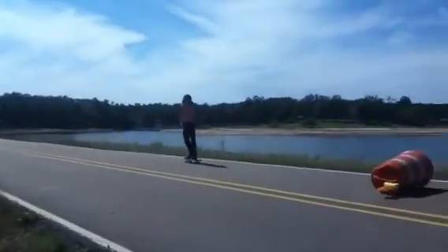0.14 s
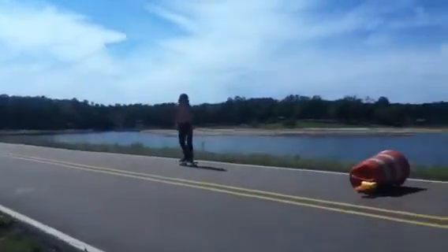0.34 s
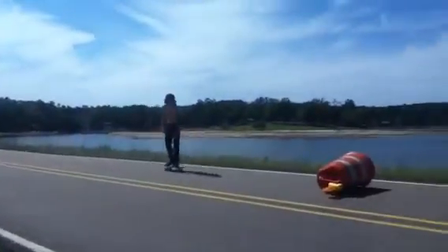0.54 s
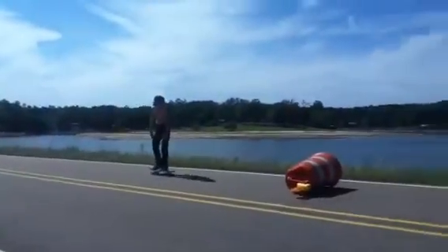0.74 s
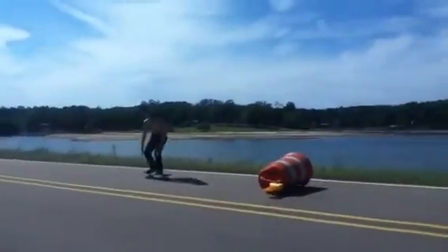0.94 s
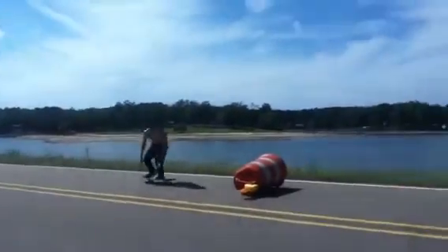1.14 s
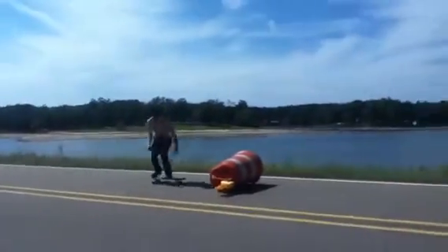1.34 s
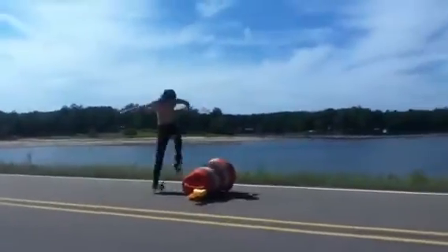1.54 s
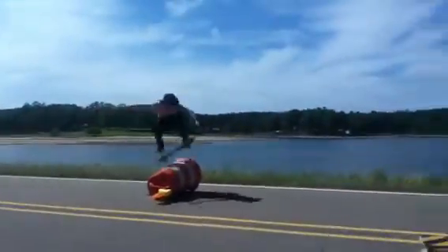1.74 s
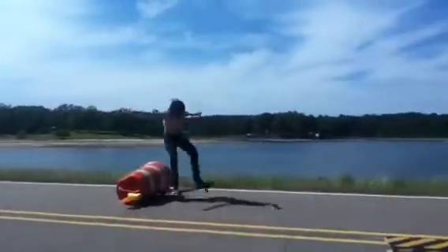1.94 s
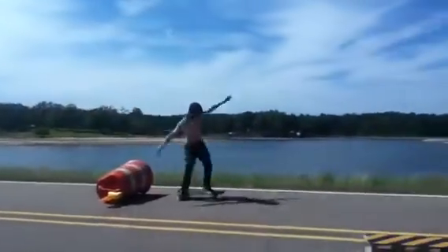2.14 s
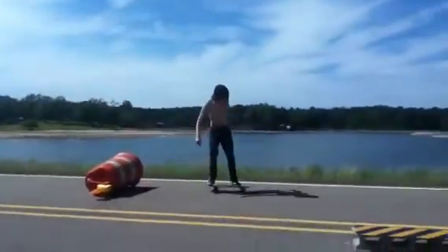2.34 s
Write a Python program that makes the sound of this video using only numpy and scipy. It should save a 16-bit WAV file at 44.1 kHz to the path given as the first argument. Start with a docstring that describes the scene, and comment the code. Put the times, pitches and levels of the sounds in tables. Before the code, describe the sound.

Skateboard rolls gritty on rough asphalt, pops its tail, goes quiet, then lands with sharp clacks

```python
"""A skateboard rolls over rough asphalt: wheels hitting stone tips give a low rumble and a gritty crunch.
It pops its tail, flies over a barrel with its wheels spinning free, lands with two clacks and rolls on.
Blows are short noise cracks with ringing wood and truck modes; pebbles click under the wheels.
Gusts, bursts of low noise with brighter turbulence, buffet a small microphone over a soft bed of open air.
The microphone overloads on the strongest gust and on the landing, and adds a thin whine."""
import sys
import numpy as np
from scipy import signal
from scipy.fft import rfft, irfft
from scipy.io import wavfile

SR = 44100
rng = np.random.default_rng(int(sys.argv[2]) if len(sys.argv) > 2 else 0)


def bounce(signal):
    """Save signal as a 16-bit WAV file at the path given by the first command-line argument."""
    frames = np.transpose(np.atleast_2d(signal))
    limited = np.clip(frames, -1, 1)
    pcm = np.round(limited * 32767).astype(np.int16)
    wavfile.write(sys.argv[1], SR, pcm)


N = 105840
TIME = np.arange(N) / SR
EDGE_HZ = 15600  # upper edge of the microphone's band


def amp(db):
    """Decibels to gain."""
    return 10 ** (np.asarray(db) / 20)


def unit(x):
    """Scales to rms 1."""
    return x / np.sqrt(np.mean(x ** 2) + 1e-20)


def level(points, axis=1):
    """Gain over time from one dB column of a curve."""
    columns = np.transpose(points)
    return amp(np.interp(TIME, columns[0], columns[axis]))


def decay(t, t60):
    """Exponential fade that falls 60 dB in t60 seconds."""
    return np.exp(-np.log(1000) * t / t60)


def colour(x, points):
    """Gives x a spectrum, at rms 1."""
    hz, db = np.transpose(points)
    f = np.fft.rfftfreq(len(x), 1 / SR)
    gain = amp(np.interp(np.log(f + 1), np.log(hz), db))
    return unit(irfft(rfft(x) * gain, len(x)))


def wander(rate_hz):
    """Slow random drift up to about a rate, at rms 1."""
    f = np.fft.rfftfreq(N, 1 / SR)
    band = f / (f + 10) * np.exp(-(f / rate_hz) ** 2)
    return unit(irfft(rfft(rng.standard_normal(N)) * band, N))


def add(mix, s, sound):
    """Mixes a sound in at a time in seconds."""
    part = mix[round(s * SR):][:len(sound)]
    part += sound[:len(part)]


STONES_PER_S, STONE_SPREAD_DB, CONTACT_SHARE = 1500, 3.5, 0.85


def stones():
    """Wheels strike countless stone tips, a few of them large, over a smooth contact noise."""
    size = amp(STONE_SPREAD_DB * np.minimum(rng.exponential(1, N), 4))
    struck = rng.random(N) < STONES_PER_S / SR
    hits = size * rng.choice([-1, 1], N) * struck
    return unit(hits) + CONTACT_SHARE * rng.standard_normal(N)


PATCH_DB, PATCH_HZ = 2.0, 35  # rms swing of each band, and how fast it swings


def patchy(x, count=24):
    """Changing asphalt: narrow bands swell and fade, each on its own."""
    place = np.log(np.fft.rfftfreq(N, 1 / SR) + SR / 20)
    place = (place - place[0]) / (place[-1] - place[0]) * (count - 1)
    spectrum = rfft(x)
    out = np.zeros(N)
    for k in range(count):
        band = irfft(spectrum * np.maximum(1 - abs(place - k), 0), N)
        out += band * amp(PATCH_DB * wander(PATCH_HZ))
    return unit(out)


# Rolling on the road: (time [s], wheel and deck rumble level [dB], grit hiss level [dB])
ROLL = [(0, -30, -37.5), (.3, -31.5, -38), (.8, -34, -35), (.93, -35, -32.5), (1.05, -31, -32.5),
        (1.2, -33, -34), (1.5, -31.5, -35), (1.55, -28, -30.5), (1.58, -29, -40.5), (1.6, -25.5, -29),
        (1.625, -79, -59), (2.04, -68, -72), (2.1, -40, -50), (2.14, -50, -44), (2.27, -35.5, -49.5),
        (2.32, -39.5, -46), (2.36, -34, -36), (2.4, -38, -33)]
# Spectrum of the wheel and deck rumble: (frequency [Hz], density [dB per Hz])
RUMBLE = [(40, -41), (150, -9), (330, 0), (480, -4), (620, -2), (860, -4.5), (1080, -14.5), (1350, -14.5),
          (1600, -23), (1950, -17.5), (2500, -53), (5000, -80)]
# Spectrum of the grit, also used for the hiss in flight: (frequency [Hz], density [dB per Hz])
GRIT = [(200, -9.5), (1200, -3.5), (2000, -2.5), (2700, -3.5), (3300, 2), (3850, 3.5), (4500, -2.5),
        (5300, -2.5), (7000, -4.5), (9000, -10.5), (11800, -16.5), (13000, -28), (16000, -26)]
RUMBLE_FLUTTER_DB, GRIT_FLUTTER_DB, FLUTTER_HZ = 1.5, 0.8, 73


def rolling():
    """The road shakes wheels and deck into a rumble and crunches as grit; both flutter together."""
    road, flutter = stones(), wander(FLUTTER_HZ)
    rumble = colour(road, RUMBLE) * unit(amp(RUMBLE_FLUTTER_DB * flutter))
    grit = patchy(colour(road + stones(), GRIT)) * unit(amp(GRIT_FLUTTER_DB * flutter))
    return rumble * level(ROLL, axis=1) + grit * level(ROLL, axis=2)


def resonance(hz, width_hz):
    """Road shocks in one resonance, which may glide; rms 1."""
    lowpass = signal.butter(2, width_hz / 2, fs=SR, output="sos")
    band = signal.sosfilt(lowpass, stones() + 1j * stones())
    phase = 2 * np.pi * np.cumsum(hz * np.ones(N)) / SR
    return unit((band * np.exp(1j * phase)).real)  # shifts the band up to its pitch


POP_S = 1.6073  # the tail pop, which also cuts off the deck drone
# Wheels and trucks sing briefly as the load shifts:
# (middle time [s], length [s], pitch at the middle [Hz], width [Hz], level [dB])
SINGS = [(.07, 0.094, 5130, 350, -44), (0.375, 0.2, 3170, 80, -43), (0.689, 0.12, 3670, 220, -40.5),
         (.87, 0.082, 3650, 300, -38.5), (1.083, 0.16, 3680, 650, -35), (1.438, 0.058, 5650, 1000, -37.5),
         (1.547, 0.014, 3400, 450, -28.5)]
SING_SAG_PER_S = .55  # fall in pitch per second, as a share of the pitch
# The loaded deck drones as the rider crouches: (time [s], level [dB])
CROUCH = [(.9, -70), (1.03, -29.5), (1.3, -36), (1.55, -32.5), (1.6, -25)]
DRONE_HZ, DRONE_WIDTH_HZ = 822, 210


def singing():
    """Narrow resonances of deck, wheels and trucks stand out of the rolling noise."""
    out = resonance(DRONE_HZ, DRONE_WIDTH_HZ) * level(CROUCH) * (TIME < POP_S)
    for s, length, hz, width, db in SINGS:
        swell = amp(db) * np.exp(-(2 * (TIME - s) / length) ** 4)
        pitch = hz * (1 - SING_SAG_PER_S * (TIME - s))
        out += swell * resonance(pitch, width)
    return out


# Spectrum of a crack, also used for the outdoor scatter: (frequency [Hz], density [dB per Hz])
CRACK = [(50, -16), (250, -8), (700, 4.5), (1150, -6), (1900, -0.5), (2600, -5.5), (3500, -2), (4500, -8.5),
         (5600, -6.5), (8000, -9.5), (11000, -16), (16000, -25)]
# Ringing modes of the tail: (frequency [Hz], level [dB], T60 [s])
TAIL = [(757, 3, 0.02), (958, 6, 0.028), (1860, -6.5, 0.014), (1980, 5, 0.02), (2540, -3.5, 0.018),
        (3470, 4, 0.016), (3760, 4, 0.016), (4030, 2, 0.014)]
# the crack and snap levels are relative, POP_DB then sets the whole pop
POP_DB, POP_CRACK_DB, POP_CRACK_T60_S, POP_DULL_HZ = -14.5, 2, .042, 7060
SNAP_DB, SNAP_S = 10.5, .00008


def pop():
    """The tail snaps on the asphalt in one sharp pressure pulse; grit cracks and the wood rings."""
    t = np.arange(SR // 5) / SR
    u = 2 - t / SNAP_S
    snap = u * np.exp(-u ** 2 / 2)
    crack = colour(rng.standard_normal(len(t)), CRACK) * decay(t, POP_CRACK_T60_S)
    ring = np.zeros(len(t))
    for hz, db, t60 in TAIL:
        ring += amp(db) * decay(t, t60) * np.sin(2 * np.pi * hz * t)
    soften = signal.butter(1, min(POP_DULL_HZ, EDGE_HZ), fs=SR)
    return amp(POP_DB) * signal.lfilter(*soften, amp(SNAP_DB) * snap + ring + amp(POP_CRACK_DB) * crack)


# Ringing modes of deck and trucks: (frequency [Hz], level [dB], T60 [s])
BOARD = [(252.4, -3.5, 0.021), (377, -5, 0.043), (513, -21.5, 0.022), (674, -3, 0.032), (754, 0.5, 0.025),
         (930, -1.5, 0.022), (1175, -13.5, 0.035), (1317, 1, 0.039), (1893, -4, 0.035), (2070, -7.5, 0.027),
         (3380, -16.5, 0.029), (3630, -14, 0.021), (5350, -6, 0.017), (5690, -3.5, 0.011)]
RING_DB, CRACK_DB, FOCUS_OCTAVES = -10, -2.5, 0.22


def blow(db, dull_hz, crack_t60, focus_hz, lift_db):
    """A short crack and the modes of the board; the place and hardness of contact colour both."""
    t = np.arange(SR // 5) / SR
    crack = colour(rng.standard_normal(len(t)), CRACK) * decay(t, crack_t60)
    ring = np.zeros(len(t))
    for k, (hz, mode_db, t60) in enumerate(BOARD):
        lift = lift_db * np.exp(-(np.log2(hz / focus_hz) / FOCUS_OCTAVES) ** 2)
        ring += (-1) ** k * amp(mode_db + lift) * decay(t, t60) * np.sin(2 * np.pi * hz * t)
    soften = signal.butter(1, min(dull_hz, EDGE_HZ), fs=SR)
    return amp(db) * signal.lfilter(*soften, amp(CRACK_DB) * crack + amp(RING_DB) * ring)


# Blows on the board: (time [s], level [dB], dull above [Hz], crack T60 [s],
# most excited pitch [Hz], lift of that pitch [dB])
BLOWS = [(1.597, -15.5, 1000, 0.037, 780, 11), (1.8697, -26.5, 4000, 0.061, 900, 4),
         (1.875, -28.5, 2480, 0.052, 250, 30), (1.917, -42, 9000, 0.032, 5500, 2),
         (2.0432, -1, 7000, 0.02, 3550, 19), (2.048, -5.5, 9000, 0.026, 5450, 11.5),
         (2.0511, -3, 5040, 0.031, 1370, 7), (2.0561, -9.5, 7950, 0.024, 250, 13),
         (2.077, -14, 12000, 0.031, 5500, 14), (2.0803, -6.5, 6000, 0.021, 2140, 11),
         (2.0835, -9, 905, 0.055, 692, 20)]
# Pebbles under the wheels: (time [s], level [dB], most excited pitch [Hz])
PEBBLES = [(.032, -27.5, 5380), (0.077, -30, 1900), (0.097, -23, 706), (0.281, -21, 8000),
           (.829, -26, 3500), (1.034, -20.5, 3500), (1.154, -30, 1900), (1.483, -23.5, 5400),
           (1.521, -22, 2000), (2.197, -29.5, 2020)]
PEBBLE_DULL_HZ, PEBBLE_T60_S, PEBBLE_LIFT_DB = 7000, 0.042, 7.5


def clacks():
    """Pebbles under the wheels, the tail pop, the feet catching the deck and the two trucks landing."""
    out = np.zeros(N)
    add(out, POP_S, pop())
    for s, *contact in BLOWS:
        add(out, s, blow(*contact))
    for s, db, hz in PEBBLES:
        add(out, s, blow(db, PEBBLE_DULL_HZ, PEBBLE_T60_S, hz, PEBBLE_LIFT_DB))
    return out


# Shoes scrape the grip tape and the free wheels hiss in the air: (time [s], level [dB])
FLIGHT = [(1.58, -65), (1.62, -48), (1.65, -45.5), (1.69, -41), (1.74, -61), (1.82, -61.5), (1.89, -45.5),
          (1.95, -52.5), (2.03, -63), (2.1, -85)]


def flight():
    """A thin scraping hiss while the board is off the ground."""
    return colour(stones(), GRIT) * level(FLIGHT)


ECHO_DB, ECHO_T60_S = -29, 0.083


def outdoors(x):
    """Faint scatter from the road and its verges: a short decaying noise tail."""
    t = np.arange(SR // 2) / SR
    tail = colour(rng.standard_normal(len(t)), CRACK) * decay(t, ECHO_T60_S)
    return x + amp(ECHO_DB) * signal.fftconvolve(x, tail / np.linalg.norm(tail))[:N]


LUMP_S, LUMP_EVENNESS = 0.041, 0.81  # span of the levelling, and its strength from 0 to 1


def eddies(points, size=N):
    """Low lumps of pressure of roughly equal strength."""
    x = colour(rng.standard_normal(size), points)
    power = signal.fftconvolve(x ** 2, signal.windows.hann(int(LUMP_S * SR)), "same")
    return unit(x / (abs(power) + 1e-9) ** (LUMP_EVENNESS / 2))


def burst(force, points):
    """Eddies under an envelope, with the energy of that envelope."""
    return unit(force * eddies(points, size=len(force))) * np.sqrt(np.mean(force ** 2))


# Gusts: (middle time [s], length [s], level [dB], eddy pitch [Hz])
GUSTS = [(0.148, 0.029, -20, 183), (0.22, 0.024, -16.5, 127), (0.264, 0.053, -18.5, 147),
         (0.321, 0.032, -16.5, 237), (0.402, 0.019, -12, 207), (0.427, 0.012, -7, 197),
         (0.441, 0.007, -8.5, 330), (.517, 0.014, -11, 152), (0.538, 0.022, -12.5, 306),
         (0.593, 0.041, -13.5, 157), (0.648, 0.047, -20, 220), (0.69, 0.013, -9.5, 166),
         (0.711, 0.021, -3, 230), (0.731, 0.024, -14, 117), (0.758, 0.034, -14.5, 132),
         (0.954, 0.057, -16, 156.6), (1.02, 0.032, -19, 133), (1.196, 0.021, -22.5, 162),
         (1.253, 0.0057, -17.5, 233), (1.39, 0.024, -16.5, 161), (1.431, 0.022, -19, 131),
         (1.491, 0.019, -19, 163), (1.58, 0.061, -18.5, 151), (1.635, 0.0086, -21, 153),
         (1.82, 0.013, -22, 165), (1.851, 0.034, -26.5, 140), (1.957, 0.039, -24, 143),
         (2.019, 0.016, -23, 150), (2.153, 0.041, -27.5, 166), (2.227, 0.058, -26.5, 170),
         (2.301, 0.044, -19.5, 159)]
# Spectrum of a gust: (multiple of the eddy pitch [ratio], density [dB per Hz])
EDDY = [(.1, -47), (.2, -37), (.38, -11.5), (.7, -1.5), (1, 0), (1.35, -6), (1.9, -18.5), (3, -26.5),
        (10, -88), (100, -110)]
# Spectrum of the brighter turbulence: (frequency [Hz], density [dB per Hz])
TURBULENCE = [(30, -83), (120, -15), (230, 9), (450, -6), (720, -14), (1100, -34.5), (1450, -26.5),
              (2500, -33), (16000, -83)]
# Steady breeze between the gusts: (time [s], level [dB])
BREEZE = [(0, -36), (.45, -21), (.85, -26), (1.15, -29.5), (1.55, -25), (1.76, -35.5), (2.1, -39),
          (2.4, -32.5)]
# Spectrum of the breeze on the microphone: (frequency [Hz], density [dB per Hz])
BUFFET = [(15, -49), (32, -23), (60, -4.5), (115, 2.5), (190, -1.5), (270, -12), (400, -20), (600, -41),
          (1500, -43), (16000, -99)]
GUST_SQUARENESS = 3.27
TURBULENCE_DB, TURBULENCE_GROWTH, STRONG_GUST_DB = -4, 1.46, -9.5


def wind():
    """Gusts buffet the microphone over a breeze; turbulence grows with force up to a strong gust."""
    out = level(BREEZE) * eddies(BUFFET)
    t = np.arange(-SR // 8, SR // 8) / SR
    strong = amp(STRONG_GUST_DB)
    for s, length, db, hz in GUSTS:
        force = amp(db) * np.exp(-abs(2 * t / length) ** GUST_SQUARENESS / 2)
        body = burst(force, np.array(EDDY) * [hz, 1])
        growth = np.minimum(force / strong, 1) ** TURBULENCE_GROWTH
        tearing = burst(amp(TURBULENCE_DB) * strong * growth, TURBULENCE)
        add(out, s + t[0], body + tearing)
    return out


# Spectrum of the open air: (frequency [Hz], density [dB per Hz])
AIR = [(30, 13.5), (400, -11), (850, 6), (2000, -2), (3000, -19), (10000, -17), (16000, -30)]
AIR_DB = -53.5


def open_air():
    """The soft steady noise of the open air."""
    return amp(AIR_DB) * colour(rng.standard_normal(N), AIR)


def scene():
    """The board with its outdoor scatter, the wind and the open air."""
    board = rolling() + singing() + clacks() + flight()
    return (outdoors(board) + wind() + open_air())[None]


WHINE_HZ, WHINE_DB = 14994, -70  # rms level going into the overload
CLIP_LEVEL, CLIP_KNEE = .76, 5  # ceiling of the overload, and how sharply it sets in
LOW_CUT_HZ = 36


def record(dry):
    """The microphone adds a thin whine, overloads on peaks and limits the band at both ends."""
    x = dry + amp(WHINE_DB) * np.sqrt(2) * np.sin(2 * np.pi * WHINE_HZ * TIME)
    # the 3.0 also turns quiet sound down by about 2 dB
    x = x / (3.0 + abs(x / CLIP_LEVEL) ** CLIP_KNEE) ** (1 / CLIP_KNEE)
    f = np.fft.rfftfreq(N, 1 / SR)
    x = irfft(rfft(x) * f ** 4 / (f ** 4 + LOW_CUT_HZ ** 4), N)
    high_cut = signal.firwin(511, EDGE_HZ, window=("kaiser", 9), fs=SR)
    return signal.oaconvolve(x, high_cut[None], "same")


dry = scene()
out = record(dry)
bounce(out)
```